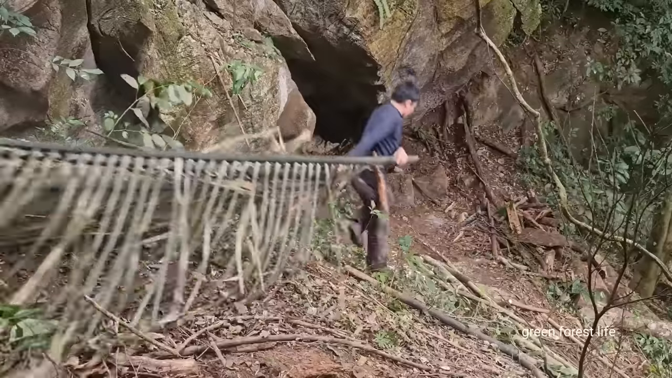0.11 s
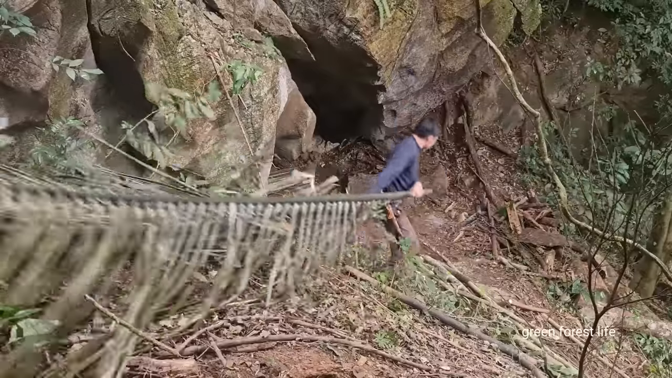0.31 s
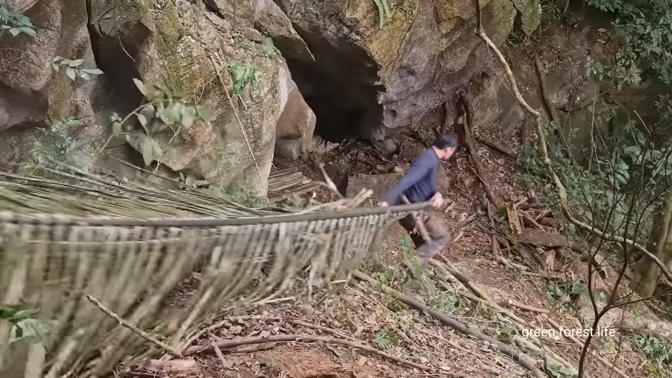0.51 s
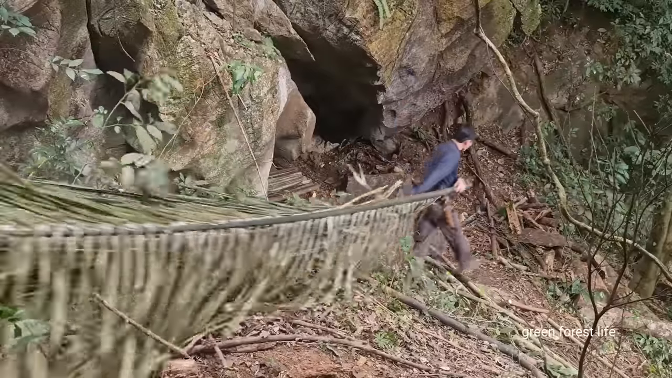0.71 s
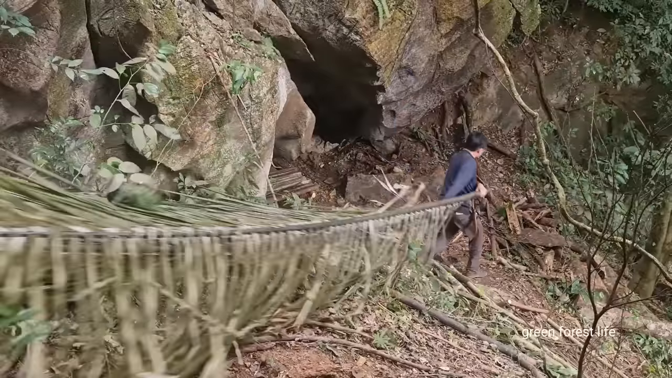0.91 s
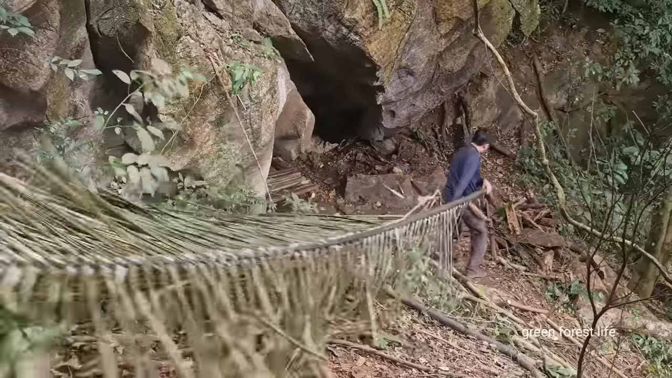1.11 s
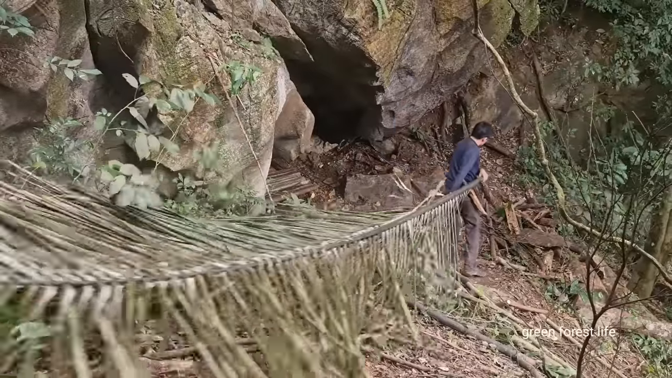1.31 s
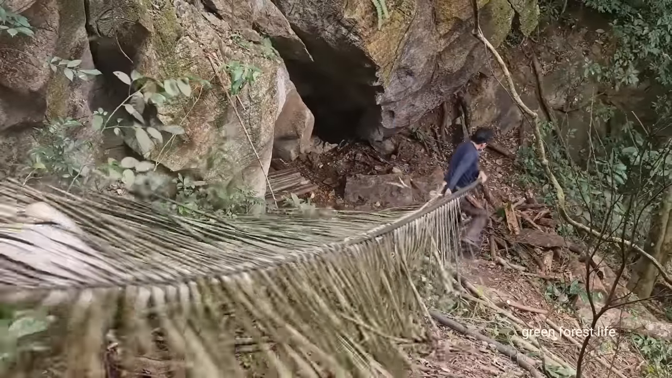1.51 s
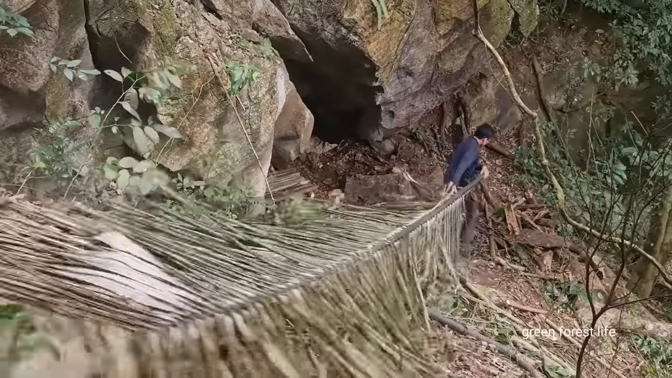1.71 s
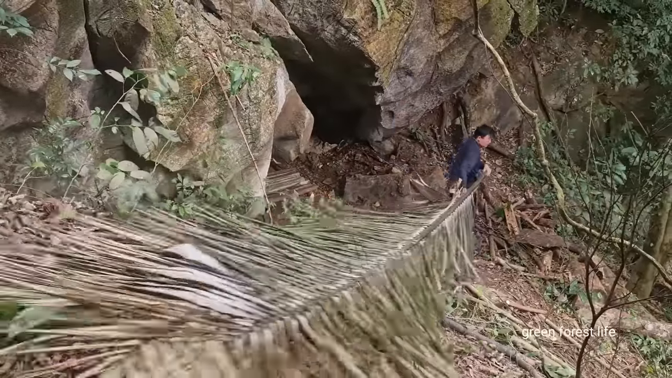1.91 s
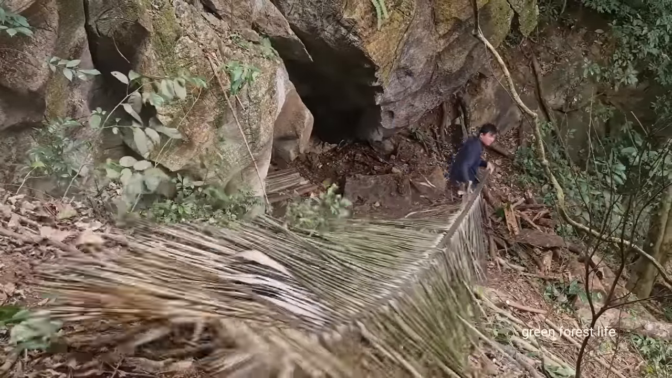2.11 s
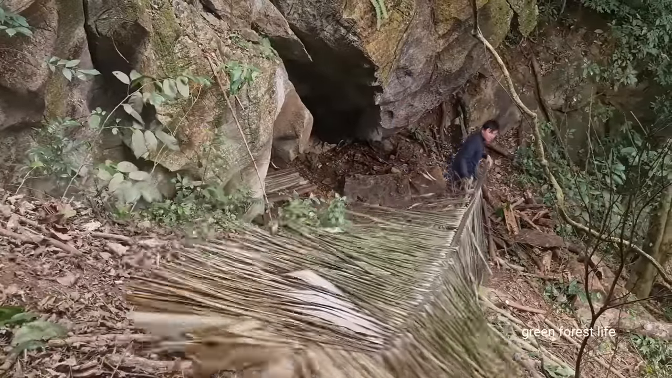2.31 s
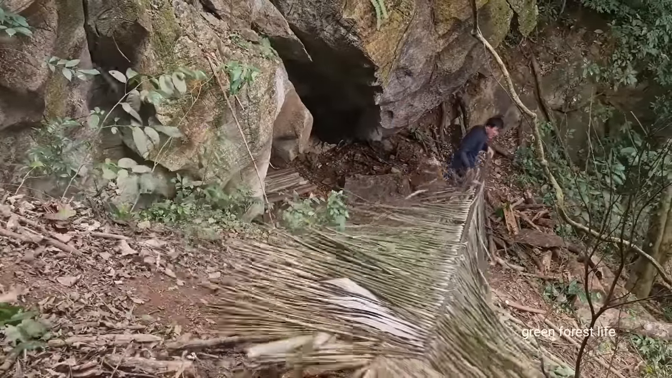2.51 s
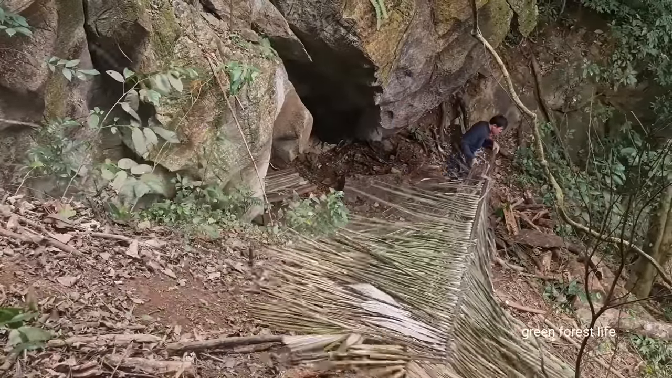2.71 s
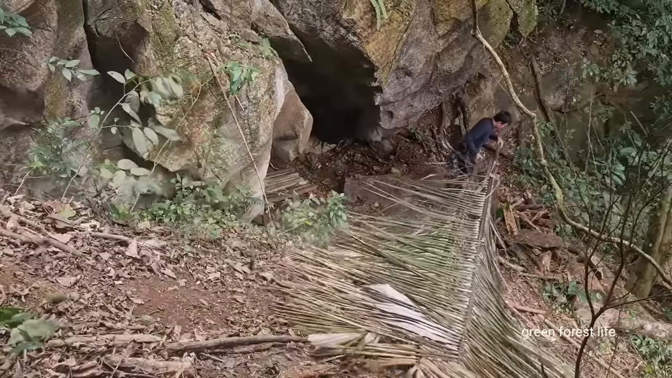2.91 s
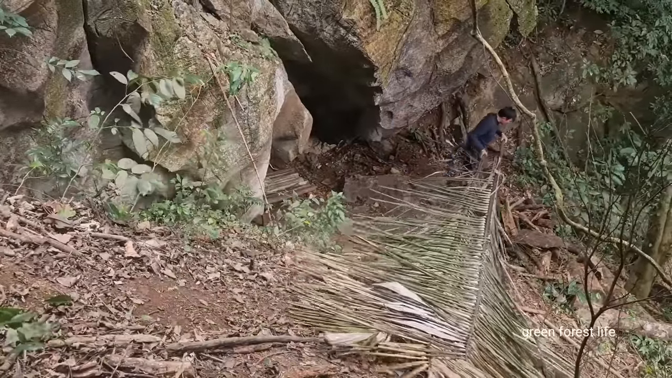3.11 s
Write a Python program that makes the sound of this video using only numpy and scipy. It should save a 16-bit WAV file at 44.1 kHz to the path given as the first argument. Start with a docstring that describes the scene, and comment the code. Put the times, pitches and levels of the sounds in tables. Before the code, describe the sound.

A big dry palm frond is dragged over leaf litter. Near quiet with faint forest hush until 0.2 s, then a sudden bright, crackling scrape, fullest around 0.5 s, with crunches and soft soil thuds. Woody stick knocks at 0.37, 0.96, 1.5 and 1.9 s; a sharp twig snap at 1.63 s. The rustle thins from 2 s, a strong knock at 2.64 s, then small ticks settle by 3.2 s. Close stereo, short rocky echo.

```python
"""After a fifth of a second of near quiet, a long leafy frond scrapes over dry leaf litter and comes to rest.
It is hauled from the left to a little right of centre, in front of two spaced microphones.
Its leaflets make thousands of tiny random ticks, ring as they flick free, and crunch in short bursts of noise.
The stem bumps the soil with dull noise, knocks on sticks that ring like damped wood, and a dry twig snaps.
The single hits have a short echo from a rock face and the trees; a faint forest hush lies under it all."""
import sys
import numpy as np
from scipy import signal
from scipy.fft import rfft, irfft
from scipy.io import wavfile
from scipy.ndimage import map_coordinates

SR = 44100
rng = np.random.default_rng(int(sys.argv[2]) if len(sys.argv) > 2 else 0)


def dump(signal):
    """Clip the signal to [-1, 1] and save it as 16-bit WAV at the path in sys.argv[1]."""
    limited = np.clip(np.atleast_2d(signal).T, -1, 1)
    pcm = np.round(limited * 32767).astype(np.int16)
    wavfile.write(sys.argv[1], SR, pcm)


N = 145530
T = np.arange(N) / SR
FREQ = np.maximum(np.arange(N // 2 + 1) * SR / N, 1)
SIDES = np.array([[.5], [-.5]])  # left and right each take half of a difference

# where the leaves drag: start_s, left_lead_ms, spread_ms, left_minus_right_db
FROND_PLACE = [(0, -0.14, 0.31, 0), (.17, -0.13, 0.12, -1), (.2, 0.5, 0.032, 1.5), (.35, 0.48, 0.055, 1.5),
               (.8, 0.43, 0.082, 2), (1.08, 0.33, 0.094, 1), (1.35, 0.35, 0.081, 1), (1.65, 0.29, 0.1, 1),
               (1.95, .16, .14, -0.5), (2.2, -0.058, 0.2, -0.5), (2.55, -0.14, 0.11, -1),
               (3.3, -0.19, 0.088, -1.5)]


def undb(db):
    """Turn decibels into a gain."""
    return 10 ** (np.asarray(db) / 20)


def curve(table, at=T, axis=1):
    """Read one column of a table, joined by straight lines."""
    rows = np.array(table)
    return np.interp(at, rows[:, 0], rows[:, axis])


def colour(table):
    """Turn points of pitch and decibels into a gain for each frequency."""
    hz, db = np.array(table).T
    return undb(np.interp(np.log(FREQ), np.log(hz), db))


def unit(x):
    """Scale a sound to an average strength (rms) of 1."""
    return x / np.sqrt(np.mean(x ** 2))


def shape(x, gain):
    """Filter a sound by a gain for each frequency."""
    return irfft(rfft(x) * gain, N)


def bell(hz, octaves):
    """Give a rounded band of frequencies, even on the octave scale."""
    return np.exp(-.5 * (np.log2(FREQ / hz) / octaves) ** 2)


def soft_low_cut(edge_hz):
    """Give a gain that falls away gently below the edge."""
    return FREQ / np.hypot(FREQ, edge_hz)


def band_noise(hz, octaves):
    """Make noise of strength 1 in a rounded band."""
    return unit(shape(rng.standard_normal(N), bell(hz, octaves)))


def walk(points_per_s):
    """Wander smoothly between random points, with a spread near 1."""
    points = rng.standard_normal(1024)
    return map_coordinates(points, [T * points_per_s], order=2, mode="mirror")


def place(x, at, pan_db):
    """Put a short sound where the frond is: it reaches one microphone sooner, and may be louder in one."""
    lead_s = curve(FROND_PLACE, at) / 1000
    time_shift = np.exp(2j * np.pi * FREQ * lead_s * SIDES)
    return shape(x, time_shift) * undb(pan_db * SIDES)


def forest():
    """Still forest air is a faint steady hush, alike in both microphones only in the bass."""
    # hz, level_db (per Hz, before the overall level is set)
    air_colour = [(30, -10), (100, -9), (250, -3), (490, -14), (660, 7.5), (810, 3), (930, -5), (1500, -1),
                  (3000, -13), (8000, -13), (15000, -24)]
    level_db, edge_hz = -57, 670
    mid, side = rng.standard_normal((2, N))
    side = shape(side, soft_low_cut(edge_hz))
    both = np.array([mid + side, mid - side])
    return undb(level_db) * unit(shape(both, colour(air_colour)))


def echo(x):
    """Rock and trees scatter the sound back, differently to each microphone and weakly in the bass."""
    t60_s, first_return_s, edge_hz = 0.082, .003, 420  # t60: time to die away by 60 dB
    fade = undb(-60 * T / t60_s) * (T > first_return_s)
    tail = rng.standard_normal((2, N)) * fade
    tail = tail / np.sqrt((tail ** 2).sum(1, keepdims=True))
    tail = shape(tail, soft_low_cut(edge_hz))
    return signal.fftconvolve(x, tail[:, :SR // 2], axes=1)[:, :N]


def bumps():
    """The heavy stem bumps soft ground: a dull band of noise swells and dies away."""
    # start_s, level_db at the top of the swell, centre_hz, swell_s
    soil_bumps = [(.25, -50, 50, 0.014), (0.405, -39, 95, 0.014), (0.455, -45, 65, 0.012),
                  (0.89, -43, 233, 0.021), (0.93, -43, 55, 0.028), (1.267, -47.5, 116, 0.018),
                  (1.678, -46, 170, 0.028), (1.752, -49, 110, 0.028), (2.303, -52, 176, 0.026),
                  (2.984, -46, 170, 0.014), (2.997, -47, 300, 0.0047), (3.04, -61, 75, 0.038)]
    out = 0
    for at, db, hz, length in soil_bumps:
        age = np.maximum(T - at, 0) / length  # counted in swell lengths
        thud = band_noise(hz, octaves=.7) * age * np.exp(1 - age)
        out = out + place(undb(db) * thud, at, 0)
    return out


def damped(hz, q):
    """Give the response of two equal damped resonances in a row; a low q rings only briefly."""
    return 1 / (1 + 1j * q * (FREQ / hz - hz / FREQ)) ** 2


def strike(body, at):
    """Hit a resonance once and scale its peak to 1."""
    hit = irfft(body * np.exp(-2j * np.pi * FREQ * at), N)
    return hit / abs(hit).max()


def knocks():
    """The stem knocks on sticks: a hard tick and a blow to damped wood, with a splintery crack and a rattle."""
    # start_s, level_db of the blow's peak, pitch_hz, left_minus_right_db
    stick_knocks = [(.2866, -38, 1700, 6), (0.3665, -17.5, 1900, -9), (0.956, -14, 1600, 1),
                    (1.4924, -14.5, 1600, 2), (1.7191, -17, 1900, -6), (1.7428, -19, 1600, 0),
                    (1.9094, -15, 1900, 3), (2.129, -21, 1800, -4), (2.27, -19, 1980, -1),
                    (2.4558, -22, 1470, -5), (2.5105, -28, 1500, -7), (2.6358, -12.5, 1610, -6),
                    (2.7379, -26.5, 1600, -6), (2.8445, -32, 1700, -7), (2.979, -31.5, 1150, -9),
                    (3.0032, -22, 2130, -3), (3.0739, -25, 1390, -3), (3.1585, -29.5, 2350, -12)]
    # levels against the blow
    tick_db, rattle_db, crack_db = -8, -20, -12
    rattle_decay_s, crack_decay_s = 0.01, 0.0066
    out = 0
    for at, db, hz, pan_db in stick_knocks:
        wood = damped(hz, q=2.2)
        blow = strike(wood, at)
        tick = strike(damped(3000, q=1.5), at)
        age = np.maximum(T - at, 0)
        rattle = unit(shape(rng.standard_normal(N), wood)) * np.exp(-age / rattle_decay_s)
        crack = band_noise(2670, octaves=0.58) * np.exp(-age / crack_decay_s)
        noise = undb(rattle_db) * rattle + undb(crack_db) * crack
        knock = blow + undb(tick_db) * tick + noise * (T > at)
        out = out + place(undb(db) * knock, at, pan_db)
    return out


def snaps():
    """A dry twig snaps: the click of the break, a burst of tearing fibres and a brief high ring."""
    # start_s, level_db (of the whole snap; the parts below are set against it)
    twig_snaps = [(1.6317, -5.8), (1.6341, -15), (1.6596, -17)]
    break_db, ring_db, splinter_db = -4, -6.5, -5
    ring_hz, ring_decay_s, splinter_decay_s = 6500, .0016, .0026
    out = 0
    for at, db in twig_snaps:
        age = np.maximum(T - at, 0)
        click = undb(break_db) * signal.unit_impulse(N, int(at * SR))
        ring = undb(ring_db) * np.sin(2 * np.pi * ring_hz * age) * np.exp(-age / ring_decay_s)
        fibres = band_noise(5200, octaves=1.5) * np.exp(-age / splinter_decay_s)
        splinters = undb(splinter_db) * fibres
        snap = click + (ring + splinters) * (T > at)
        out = out + place(undb(db) * snap, at, 0)
    return out


def crunches():
    """Leaflets catch and let go: short bursts of fibre noise swell and die away."""
    # start_s, level_db at the top of the swell, centre_hz, width_octaves, rise_s, decay_s
    leaf_crunches = [(.076, -46, 5500, 0.53, .001, 0.0036), (0.259, -20.5, 4200, 0.44, 0.0017, 0.0049),
                     (0.4733, -15, 4460, 1.0, 0.00042, 0.0016), (.48, -34, 9000, 0.88, .002, .012),
                     (0.5095, -21, 2630, 1, 0.0013, 0.0025), (0.522, -19, 3200, 0.26, 0.0025, 0.0089),
                     (.69, -22, 3500, 0.35, 0.0086, 0.018), (.733, -22, 2600, 0.48, .0006, .002),
                     (.758, -30, 2200, .6, 0.0078, .02), (1.031, -23, 3000, 0.96, .0005, 0.0027),
                     (1.253, -24.5, 3800, .5, 0.017, 0.019), (1.269, -16, 4560, 0.32, 0.00042, 0.0016),
                     (1.719, -22, 2000, 1, 0.014, 0.015), (1.893, -23, 2860, 0.42, 0.0062, .018),
                     (2.978, -43, 1000, 0.92, .002, 0.0061), (3.002, -32, 2180, 0.22, 0.0021, 0.0089),
                     (3.066, -31, 2100, .3, .002, 0.0091), (3.213, -31, 6500, 0.37, 0.0011, .003),
                     (3.226, -34, 3400, 0.33, .003, 0.0069)]
    out = 0
    for at, db, hz, octaves, rise, decay in leaf_crunches:
        swell = np.clip((T - at) / rise, 0, 1)
        fade = np.exp(-np.maximum(T - at - rise, 0) / decay)
        burst = band_noise(hz, octaves) * swell * fade
        out = out + place(undb(db) * burst, at, curve(FROND_PLACE, at, axis=3))
    return out


def ticks(per_s, scatter_db, lead, spread):
    """Random ticks of uneven size, each from its own spot along the frond; lead and spread in samples."""
    at = np.flatnonzero(rng.random(N) < per_s / SR)
    size, spot, sign = rng.standard_normal((3, len(at)))
    size = np.sign(sign) * undb(scatter_db * np.minimum(size, 1.8))  # no giant ticks
    lag = np.rint(lead[at] + spread[at] * spot).astype(int)
    left = at - lag // 2
    right = left + lag
    return unit(np.array([np.bincount(i % N, size, N) for i in (left, right)]))


def twangs(lead, spread, count):
    """Stiff dry leaflets flick free and ring briefly, each at its own pitch; lead and spread in samples."""
    low_hz, high_hz, decay_s, scatter_db = 601.3, 15220, 0.023, 1
    when, pitch, turn = rng.random((3, count, 1))
    size, spot = rng.standard_normal((2, count, 1))
    at = (when * N).astype(int)
    age = np.arange(SR // 25)  # in samples
    hz = low_hz * (high_hz / low_hz) ** np.sqrt(pitch)  # high pitches are more common
    strength = hz ** 0.09 * undb(scatter_db * np.minimum(size, 2))
    tone = np.sin(2 * np.pi * (hz * age / SR + turn))
    ring = strength * np.exp(-age / SR / decay_s) * tone
    lag = np.rint(lead[at] + spread[at] * spot).astype(int)
    return unit(np.array([np.bincount(((i + age) % N).ravel(), ring.ravel(), N) for i in (at, at + lag)]))


def lift(x, peaks, fade_start_s, fade_end_s):
    """Give what a set of resonances adds to a sound until it fades out."""
    gain = undb(sum(db * bell(hz, octaves) for hz, octaves, db in peaks))
    return shape(x, gain - 1) * np.interp(T, (fade_start_s, fade_end_s), (1, 0))


def leaf_scrape():
    """Mix crackles, twangs and dense ticks in flickering octave bands with their wash off the surroundings."""
    # long waves bend round the recorder, which stretches the left lead in the bass; the middle comes from
    # nearer the centre, with less lead: hz, factor
    bend = [(100, 1.3), (250, 1.7), (480, 1.71), (960, 0.99), (1900, 0.84), (3800, 1)]
    crackle_db, twang_db, wash_db, flicker_db = -8, -7.5, 0.5, 0.86
    lead, spread = (curve(FROND_PLACE, axis=k) * SR / 1000 for k in (1, 2))  # ms to samples
    centres = 30 * 2. ** np.arange(10)
    bands = np.array([bell(hz, .4) for hz in centres])
    bands /= np.sqrt((bands ** 2).sum(0)) + 1e-12  # together the bands carry even power
    out = undb(crackle_db) * ticks(420, 5, lead, spread)
    out = out + undb(twang_db) * twangs(lead, spread, count=1500)
    for hz, band in zip(centres, bands):
        dense = ticks(9000, 4, lead * curve(bend, hz), spread)
        flicker = undb(flicker_db * walk(points_per_s=82.1))
        out = out + shape(unit(dense * flicker), band)
    wash = shape(rng.standard_normal((2, N)), soft_low_cut(1700))
    return out + undb(wash_db) * wash


def rustle():
    """The dragging leaves: the scrape is coloured, its low and woody parts rise and fall, and it surges."""
    # loudness of the drag, before the lifts and surges: start_s, level_db
    drag = [(0, -40.5), (.05, -47), (.09, -46), (.15, -52), (.183, -48.5), (.203, -28.5), (.24, -26.5),
            (.275, -21.5), (.36, -20.5), (.5, -18.5), (.6, -20.5), (.77, -20.5), (.87, -21.5), (1.0, -22.5),
            (1.28, -21.5), (1.36, -24), (1.78, -23.5), (2.0, -25.5), (2.1, -25), (2.47, -27), (2.58, -28.5),
            (2.68, -28.5), (2.8, -32), (2.98, -32), (3.08, -35), (3.3, -36.5)]
    # low scrape against the leaf ticks: start_s, change_db
    low_scrape = [(0, -20), (.17, -16), (.21, 1.5), (.9, 1.5), (1.2, -0.5), (1.85, 0), (2.2, -2), (2.6, -1),
                  (3.3, -0.5)]
    # woody middle of the rustle: start_s, change_db
    woody_middle = [(0, -2), (.25, -0.5), (.5, 1.5), (1.2, -0.5), (1.7, 0), (2.25, 1.5), (2.7, 0.5),
                    (3.3, -0.5)]
    # basic colour: hz, level_db (per Hz, before the overall level is set)
    leaf_colour = [(25, -33), (65, -15), (130, -12.5), (260, -8.5), (450, -6.5), (800, -0.8), (1020, -8),
                   (1450, -1), (2100, -2.5), (3000, -1.5), (4700, -5), (6700, -3), (7900, -10.5),
                   (12500, -10), (15000, -14.5)]
    # hollow resonances of the scraping stem: centre_hz, width_octaves, lift_db
    hollow = [(450, 0.26, 3.2), (606, 0.21, 1.6), (1030, 0.21, 2.5), (1350, 0.086, 3)]
    # bright swish of the leaflets: centre_hz, width_octaves, lift_db
    swish = [(3760, 0.2, 2.7), (5440, 0.083, 3)]
    surge_db, low_edge_hz = 0.35, 920
    out = unit(shape(leaf_scrape(), colour(leaf_colour) * (FREQ > 20)))
    low = shape(out, 1 / (1 + (FREQ / low_edge_hz) ** 10))
    woody = shape(out, bell(1800, octaves=0.57))
    out = out + low * (undb(curve(low_scrape)) - 1) + woody * (undb(curve(woody_middle)) - 1)
    # the hollow tone and the swish fade as the frond moves off and slows
    out = out + lift(out, hollow, fade_start_s=1.3, fade_end_s=2.2)
    out = out + lift(out, swish, fade_start_s=0.58, fade_end_s=1)
    pan_db = curve(FROND_PLACE, axis=3) * SIDES
    surge = surge_db * walk(points_per_s=44.6)
    return out * undb(curve(drag) + surge + pan_db)


def scene():
    """Add up the forest, the single hits with their echo, and the dragged frond."""
    hits = bumps() + knocks() + snaps() + crunches()
    echo_db = -6
    return forest() + undb(echo_db) * echo(hits) + hits + rustle()


def record(dry):
    """The two microphones differ a little in colour; the recorder cuts the deepest bass and the top treble."""
    # hz, left_minus_right_db
    mic_balance = [(60, -4), (110, 2), (200, -1.5), (380, 1), (700, 1), (1290, -2), (2380, -0.5),
                   (4400, -1), (8120, -1.5), (15000, 1)]
    low_cut_hz, top_hz = 31, 15600
    bass_cut = 1 / (1 + (low_cut_hz / FREQ) ** 4)
    heard = shape(dry, colour(mic_balance) ** SIDES * bass_cut)
    treble_cut = signal.ellip(10, .1, 75, top_hz, fs=SR, output="sos")
    return signal.sosfilt(treble_cut, heard)


dry = scene()
out = record(dry)
dump(out)
```